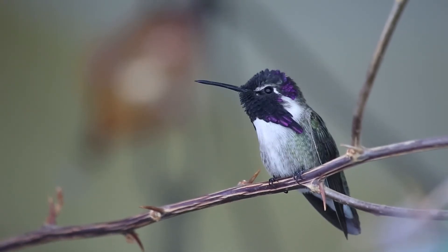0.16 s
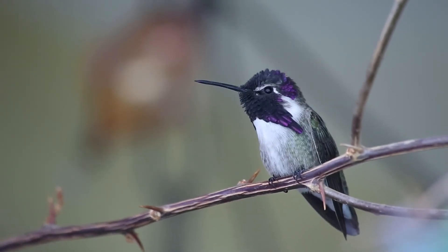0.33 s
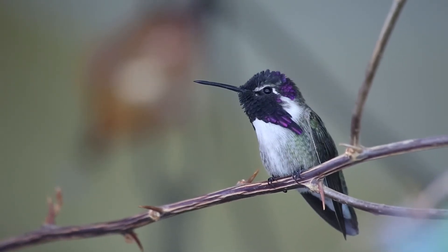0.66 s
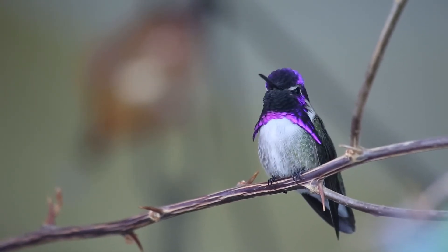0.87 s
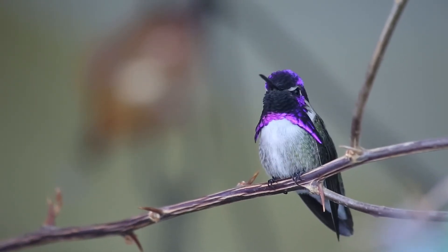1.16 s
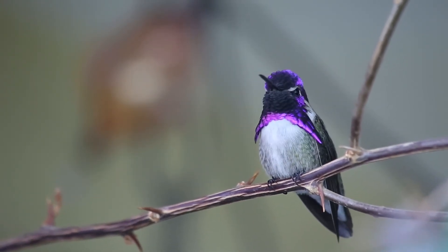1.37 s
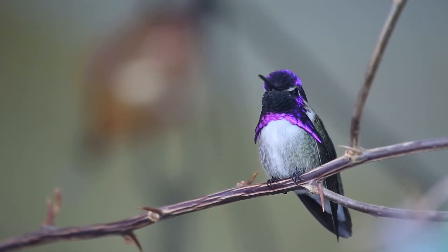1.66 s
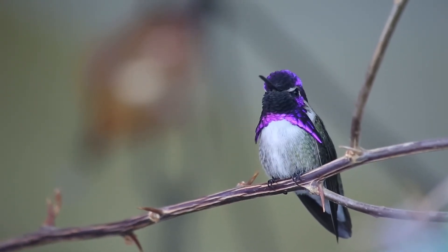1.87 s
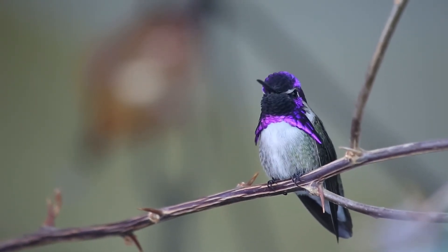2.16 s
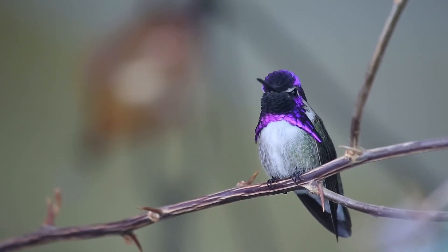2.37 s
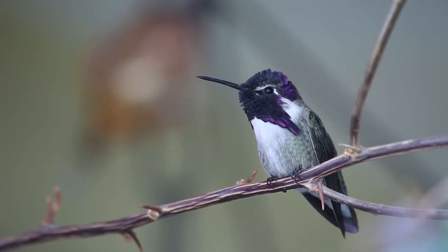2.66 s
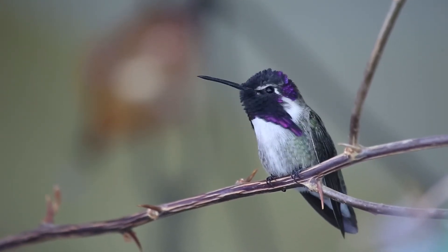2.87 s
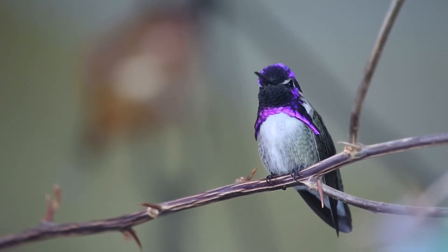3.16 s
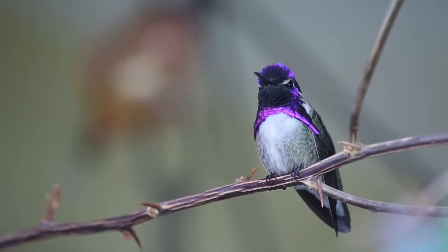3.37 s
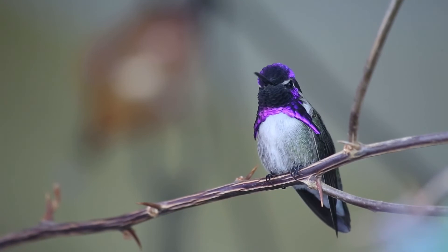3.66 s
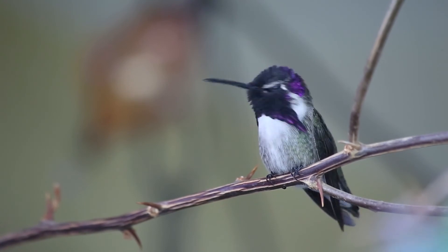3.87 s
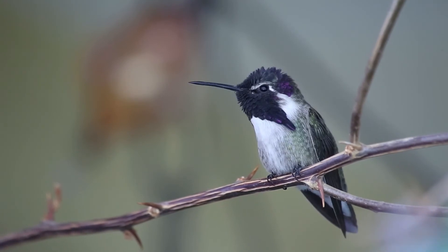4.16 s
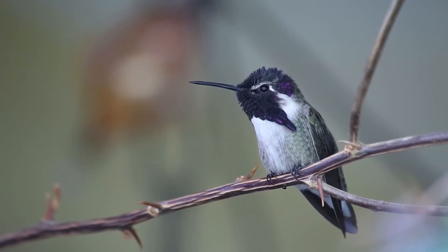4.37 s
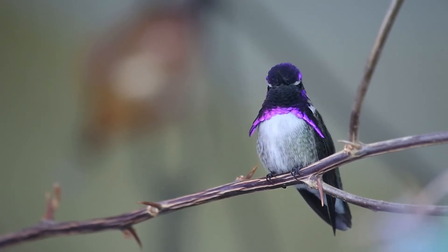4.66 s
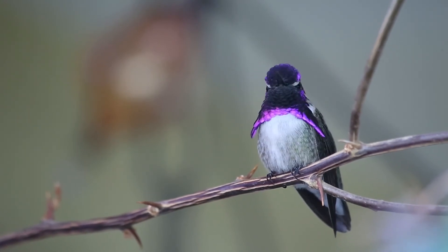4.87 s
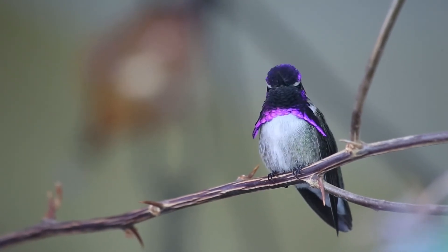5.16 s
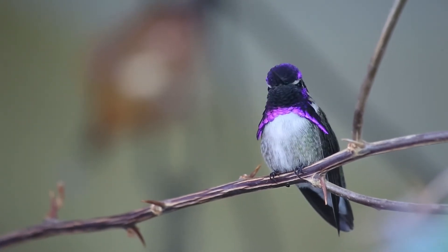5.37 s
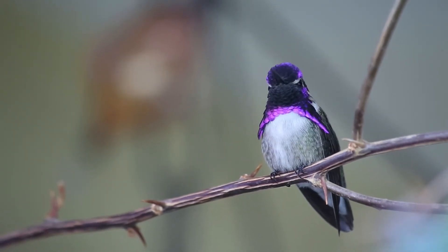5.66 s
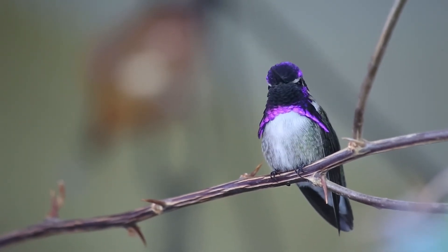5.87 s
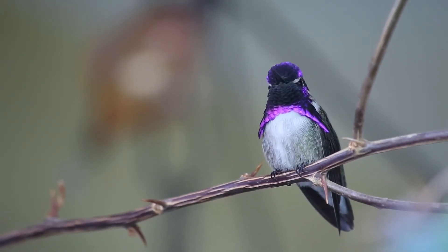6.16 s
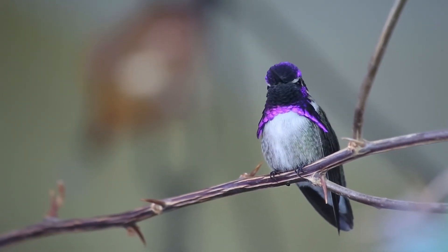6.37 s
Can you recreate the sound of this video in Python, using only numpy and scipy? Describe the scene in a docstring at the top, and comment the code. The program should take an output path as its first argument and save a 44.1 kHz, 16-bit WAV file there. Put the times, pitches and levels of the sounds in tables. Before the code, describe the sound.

Outdoors, a regular cricket trill and a thin high insect whine lie under soft air hiss and faint electrical hum. In front, a hummingbird gives bright, very short chips and scratchy buzzes, three times spilling into rapid ticking. Echoes trail softly. Distant peeps come early, then thin whistles and low slurred ones, and tiny knocks; near the end two bright snaps click close to the bird.

```python
"""Close to the microphone, a perched hummingbird opens with a whistled chip and a short buzz, and such
chips and buzzes, each a whistle on its own pitch curve, return to the end, often in pairs, with echoes.
From the start a cricket chirps near 4.2 kHz over a whine of far insects, a mains hum and outdoor hiss.
Faint far peeps soon join; from 0.84 s on, three of the buzzes run on into a rattle of fast swept ticks.
Thin whistles, then low ones, follow far off among small knocks; two bright noise snaps come late."""
import sys
import numpy as np
from scipy import signal
from scipy.fft import rfft, irfft
from scipy.io import wavfile

SR = 44100
rng = np.random.default_rng(int(sys.argv[2]) if len(sys.argv) > 2 else 0)


def persist_wave(psi):
    """Save psi, clipped to +-1, as 16-bit WAV."""
    counts = np.round(np.clip(psi, -1, 1) * 32767).astype(np.int16)
    wavfile.write(sys.argv[1], SR, np.atleast_2d(counts).T)


N = 287532   # length of the scene in samples


def from_db(db):
    """Decibels to gain."""
    return 10 ** (np.asarray(db) / 20)


def rms_one(x):
    """Scale to unit power."""
    return x / np.sqrt(np.mean(x ** 2) + 1e-20)


def seconds(length):
    """Time axis of a short sound."""
    return np.arange(int(length * SR)) / SR


def add(track, start, sound):
    """Mix a sound into the track at a time in seconds, dropping what lies outside."""
    at = int(round(start * SR)) + np.arange(len(sound))
    inside = (at >= 0) & (at < N)
    track[at[inside]] += sound[inside]


def band(x, low_hz, high_hz):
    """Butterworth band-pass."""
    edges = [low_hz, min(high_hz, .45 * SR)]
    return signal.sosfilt(signal.butter(2, edges, "band", fs=SR, output="sos"), x)


def wobble(count, low_hz, high_hz):
    """Band-limited noise with a spread of about 1, for unsteadiness or for the sound itself."""
    run_in = SR // 4   # lets the filter settle
    noise = rng.standard_normal(count + run_in)
    return rms_one(band(noise, low_hz, high_hz))[-count:]


def whistle(hz, overtone_db):
    """A vibrating membrane: a sine on the pitch curve and its weak octave."""
    phase = 2 * np.pi * np.cumsum(hz) / SR
    return np.sin(phase) + from_db(overtone_db) * np.sin(2 * phase)


def swell(t, length, rise, fall):
    """Rounded rise and fall of a note."""
    rising = np.sin(np.pi / 2 * np.clip(t / rise, 0, 1))
    falling = np.sin(np.pi / 2 * np.clip((length - t) / fall, 0, 1))
    return rising * falling


def scatter(x, t60, build_s):
    """Diffuse echoes from foliage and walls: they build up, then die away."""
    t = seconds(1.2 * t60)
    build_up = 1 - np.exp(-(t / build_s) ** 2)
    tail = rng.standard_normal(len(t)) * from_db(-60 * t / t60) * build_up
    return signal.fftconvolve(x, tail / np.linalg.norm(tail))[:N]


def chips(dive_overtone_db=-5, arch_depth=0.083, waver=0.011):
    """Whistled chips: the pitch dives to about 3 kHz, springs back and holds in a shallow arch."""
    # Each row: start in seconds, length in seconds, held pitch in Hz before the arch,
    # level in dB before the swell, octave in dB relative to the whistle.
    chip_rows = [(-.0125, 0.041, 5586, -6, -24.5), (1.1335, 0.044, 5386, -9, -17),
                 (1.88, 0.037, 5560, -9, -17.5), (3.0492, 0.039, 5340, -9, -20.5),
                 (3.8004, 0.047, 5460, -12.5, -24), (4.955, 0.042, 5275, -10, -22.5),
                 (5.689, 0.043, 5470, -11, -18.5)]
    # The dive and rise that opens a chip. Each row: seconds after its start, pitch as a ratio
    # to the held pitch, level in dB relative to the chip.
    opening = [(0, 1.42, -28), (.0005, 1.3, -9), (.0011, .95, -2), (.0016, .7, -10), (.0023, .55, -16),
               (.0031, .8, -8), (.004, .92, -3), (.007, .98, -2), (.012, 1, 0)]
    out = np.zeros(N)
    when, ratio, level_db = np.transpose(opening)
    for start, length, hz, db, overtone_db in chip_rows:
        t = seconds(length)
        arch = 1 - arch_depth * (t / length - .5) ** 2 + waver * wobble(len(t), 66, 660)
        pitch = np.interp(t, when, ratio) * arch
        # at the bottom of the dive the octave falls into the throat resonance
        octave_curve_db = [dive_overtone_db, overtone_db, overtone_db, -50]
        octave_db = np.interp(pitch, [.6, .9, 1.05, 1.2], octave_curve_db)
        loud = from_db(db + np.interp(t, when, level_db)) * swell(t, length, .0002, 0.55 * length)
        add(out, start, loud * whistle(hz * pitch, octave_db))
    return out


def buzzes(flutter_hz=375, swing_hz=700, onset_swing_hz=550, fall_hz=1850, fall_s=0.0105,
           throat_hz=6550, throat_width_hz=1050, overtone_db=-29, rasp_db=-41):
    """A falling whistle swung by a fast flutter, strongest as it crosses the throat resonance."""
    # Each row: start in seconds, length in seconds, pitch in Hz toward which the flutter's centre falls,
    # level in dB before the throat resonance and the swell.
    buzz_rows = [(0.1095, 0.038, 6730, -5), (0.809, 0.024, 6720, -5), (2.0089, 0.039, 6680, -6.5),
                 (2.6803, 0.029, 6640, -11.5), (3.924, 0.042, 6630, -9), (4.6676, 0.027, 6850, -8.5),
                 (5.8116, 0.046, 6620, -9.5)]
    out = np.zeros(N)
    for start, length, hz, db in buzz_rows:
        t = seconds(length)
        tension = np.exp(-t / fall_s)   # as it relaxes, the pitch sinks and the flutter slows and narrows
        rate = flutter_hz * (1 + 0.16 * tension + 0.015 * rng.standard_normal())
        flutter = np.cos(2 * np.pi * np.cumsum(rate) / SR)
        swing = (swing_hz + onset_swing_hz * tension) * flutter
        pitch = hz + fall_hz * tension + swing + 110 * wobble(len(t), 55, 2350)
        throat = 1 / np.sqrt(1 + ((pitch - throat_hz) / throat_width_hz) ** 2)
        rasp = from_db(rasp_db) * rng.standard_normal(len(t))
        voice = throat * whistle(pitch, overtone_db) + rasp
        add(out, start, from_db(db) * swell(t, length, 0.0034, 0.65 * length) * voice)
    return out


def rattles(top_hz=8600, bottom_hz=3250, length=0.0026, width_s=0.00046, skirt_db=-18,
            gain_db=1.0, rough=0.048, spread_db=1.0, hurried_gaps=2, hurried_gap_s=.0108):
    """A train of ticks; each is one very fast, uneven downward sweep, loudest in its middle."""
    # Each row: middle of the first tick in seconds, number of ticks, steady gap in seconds.
    trains = [(.8376, 16, .01375), (2.7105, 19, .01338), (4.697, 14, .0138)]
    # Effort through the rattles. Each row: time in seconds, tick level in dB before spread and gain.
    effort = [(.838, -18), (.88, -19), (.94, -15.5), (1.01, -16), (1.04, -18.5), (2.71, -13), (2.73, -21.5),
              (2.836, -22), (2.85, -16.5), (2.933, -16), (2.95, -19), (4.70, -17), (4.856, -17.5),
              (4.872, -26)]
    out, t = np.zeros(N), seconds(length)
    peak = np.exp(-.5 * ((t - length / 2) / width_s) ** 2)
    shape = (peak + from_db(skirt_db)) * swell(t, length, 0.00018, 0.0006)
    for when, ticks, gap in trains:
        for k in range(ticks):
            db = np.interp(when, *np.transpose(effort)) + spread_db * rng.standard_normal()
            uneven = 1.094 + 0.034 * rng.standard_normal() + rough * wobble(len(t), 270, 1700)
            pitch = np.geomspace(top_hz, bottom_hz, len(t)) * uneven
            add(out, when - length / 2, from_db(db + gain_db) * shape * whistle(pitch, -24.5))
            when += hurried_gap_s if k < hurried_gaps else gap   # the first gaps are shorter
    return out


def crickets(length=0.019, droop_hz=40, scatter_hz=22, stroke_gap_s=.0282,
             near_hz=4176, near_db=-33, far_hz=4020, far_db=-40.5,
             chorus_db=-49.5, chorus_low_hz=4010, chorus_high_hz=4320, haze_db=-55, echo_db=-16):
    """Each wing stroke rings one slightly falling tone; many far insects blur into a thin whine."""
    # The near cricket. Each row: start in seconds, number of wing strokes.
    near_chirps = [(-.009, 6), (.432, 6), (.846, 5), (1.285, 5), (1.671, 5), (2.031, 5), (2.581, 5),
                   (2.998, 5), (3.437, 5), (3.823, 6), (4.291, 5), (4.732, 5), (5.2, 6), (5.696, 5),
                   (6.166, 5)]
    # A lower, farther cricket: chirp starts in seconds.
    far_chirps = [.98, 2.159, 4.51, 5.141, 5.896, 6.452]
    out, t = np.zeros(N), seconds(length)
    stroke = swell(t, length, .006, .009)
    chorus_level = from_db(chorus_db + 2.2 * wobble(N, 3.3, 15.5))
    chorus = chorus_level * wobble(N, chorus_low_hz, chorus_high_hz)
    haze = from_db(haze_db) * wobble(N, 3800, 4980)
    near = [(start, strokes, near_hz, near_db) for start, strokes in near_chirps]
    far = [(start, 5, far_hz, far_db) for start in far_chirps]   # five strokes each
    for start, strokes, hz, db in near + far:
        for k in range(int(round(strokes))):
            pitch = hz + droop_hz * (.5 - t / length) + rng.normal(0, scatter_hz)
            tone = whistle(pitch, -43)
            when = start + stroke_gap_s * (k + rng.normal(0, .03))
            add(out, when, from_db(db + rng.normal(0, 1)) * stroke * tone)
    return out + from_db(echo_db) * scatter(out, .3, 0.011) + chorus + haze


def far_birds(gain_db=-2, waver=0.022):
    """Three far birds each repeat a faint slurred whistle, mostly echo by the time it arrives."""
    # Each note: length in seconds, start pitch in Hz, end pitch in Hz, before call ratio and waver.
    peep_note = (.052, 2860, 2730)
    thin_note = (0.23, 5000, 4920)
    low_note = (0.204, 1440, 1370)
    # Short falling peeps. Each row: start in seconds, level in dB before gain, swell and distance.
    peeps = [(0.181, -39.5), (2.259, -44.5), (2.49, -49), (3.023, -43), (6.445, -49)]
    # Thin high whistles, slightly falling. Each row: as for the peeps.
    thin_calls = [(1.665, -52), (3.591, -51), (5.418, -50)]
    # Low slurred whistles. Each row: as for the peeps, then pitch as a ratio to the note.
    low_calls = [(3.38, -53.5, 1.06), (3.539, -51, 1.08), (4.123, -46, 1), (4.769, -48.5, 0.96)]
    out = np.zeros(N)

    def sing(note, start, db, ratio=1):
        """One gliding note."""
        length, from_hz, to_hz = note
        t = seconds(length)
        glide = ratio * np.linspace(from_hz, to_hz, len(t))
        pitch = glide * (1 + waver * wobble(len(t), 25, 130))
        loud = from_db(db + gain_db) * swell(t, length, 0.14 * length, 0.38 * length)
        add(out, start, loud * whistle(pitch, -44))

    for note, calls in (peep_note, peeps), (thin_note, thin_calls), (low_note, low_calls):
        for call in calls:
            sing(note, *call)
    return .5 * out + scatter(out, 0.21, 0.016)


def taps(t60=0.035, snap_t60=0.0078):
    """Small dry knocks and bright snaps: bands of noise that die away at once."""
    # Knocks. Each row: start in seconds, ring in Hz, starting noise level in dB.
    knocks = [(.119, 373, -37), (.817, 350, -37), (2.024, 603, -41), (2.183, 790, -39), (2.798, 1410, -33),
              (5.7833, 600, -37.5)]
    # Bright snaps. Each row: start in seconds, starting noise level in dB.
    snaps = [(5.204, -23), (5.782, -17.5)]
    out, t = np.zeros(N), seconds(0.063)
    for start, hz, db in knocks:
        add(out, start, from_db(db - 60 * t / t60) * wobble(len(t), 0.68 * hz, 1.5 * hz))
    for start, db in snaps:
        add(out, start, from_db(db - 60 * t / snap_t60) * wobble(len(t), 3300, 16000))
    return out


def background(air_db=-44.5, dip_db=-9.5, dip_width_s=0.0075):
    """Shaped outdoor noise whose level dips briefly, over a slightly wavering mains hum."""
    # Spectrum of the outdoor hiss. Each row: frequency in Hz, relative spectral level in dB.
    air = [(20, 1), (38, 12), (80, 2.5), (120, 2.5), (180, -1), (450, 3), (900, 1), (2000, -1.5),
           (3300, -2), (5000, -2.5), (8000, -2), (15500, -2.5)]
    # Mains hum. Each row: frequency in Hz, sine amplitude in dB before the waver.
    hum_rows = [(60, -55), (120, -66), (180, -76), (240, -73), (300, -72)]
    # Middles of the brief dips in the hiss, in seconds.
    dips = [1.29, 1.674, 2.295, 2.594, 2.93, 3.23, 3.49, 3.98, 4.17, 4.225, 5.324, 6.089]
    t = np.arange(N) / SR
    hz, db = np.transpose(air)
    bins = np.maximum(np.fft.rfftfreq(N, 1 / SR), 1)
    colour = from_db(np.interp(np.log(bins), np.log(hz), db))
    hiss = rms_one(irfft(rfft(rng.standard_normal(N)) * colour, N))
    dips_db = dip_db * sum(np.exp(-.5 * ((t - s) / dip_width_s) ** 2) for s in dips)
    hum = sum(from_db(level) * np.sin(2 * np.pi * (f * t + rng.random())) for f, level in hum_rows)
    waver = 1 + .05 * wobble(N, 3, 20)
    return from_db(air_db + dips_db) * hiss + hum * waver


def scene(near_db=-13, near_t60=0.31, far_db=-23, far_t60=0.77, rattle_spread_db=-4, rattle_t60=0.056):
    """The hummingbird and its echoes in front of the garden sounds."""
    # Echoes from nearby surfaces. Each row: delay in seconds, level in dB relative to the bird.
    echoes = [(.0033, -14), (.0071, -24)]
    ticks = rattles()
    bird = chips() + buzzes() + ticks
    near_echo = from_db(near_db) * scatter(bird, near_t60, 0.013)
    far_echo = from_db(far_db) * scatter(bird, far_t60, 0.018)
    out = bird + near_echo + far_echo
    # each tick leaves a short rough smear
    out += from_db(rattle_spread_db) * scatter(ticks, rattle_t60, 0.0015)
    for delay, db in echoes:
        add(out, delay, from_db(db) * bird)
    return (out + crickets() + far_birds() + taps() + background())[None]


def record(dry, cutoff_hz=16000):
    """The top is cut steeply by an elliptic low-pass."""
    return signal.sosfilt(signal.ellip(12, .1, 80, cutoff_hz, fs=SR, output="sos"), dry)


dry = scene()
out = record(dry)
persist_wave(out)
```